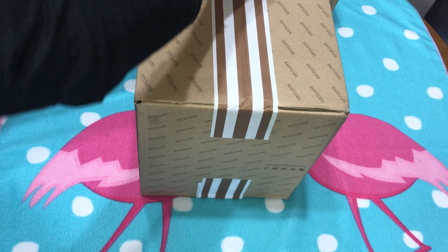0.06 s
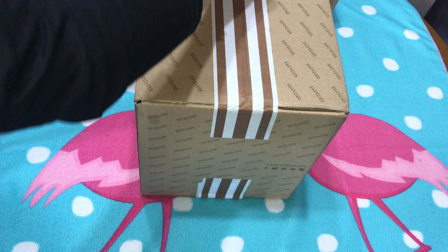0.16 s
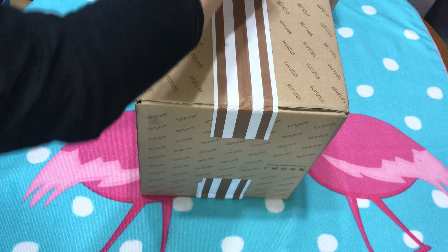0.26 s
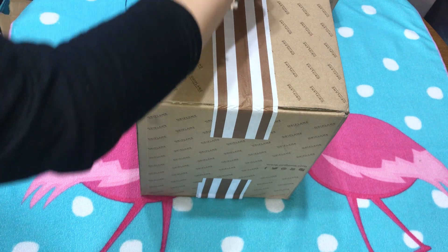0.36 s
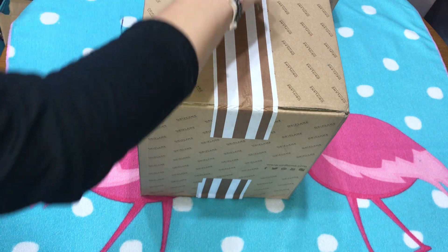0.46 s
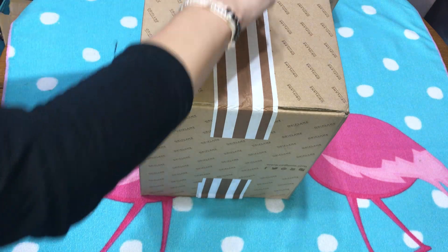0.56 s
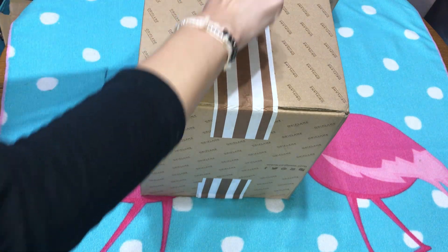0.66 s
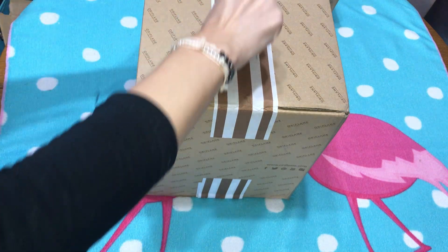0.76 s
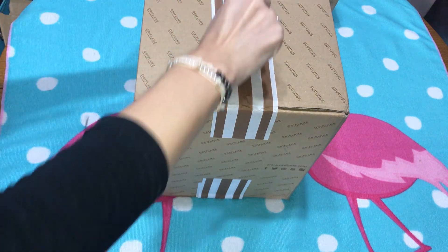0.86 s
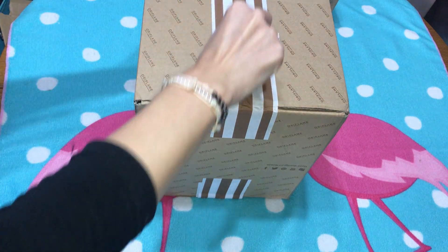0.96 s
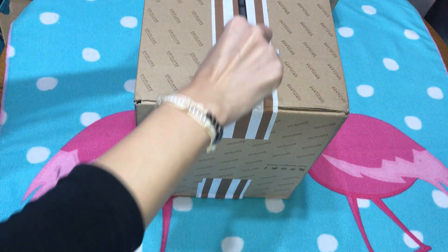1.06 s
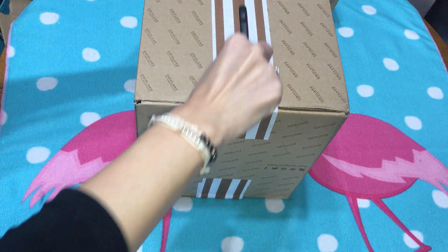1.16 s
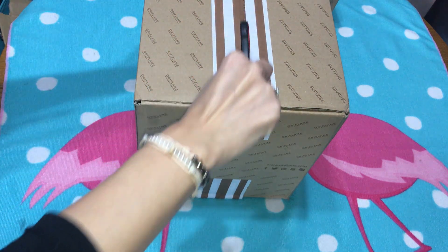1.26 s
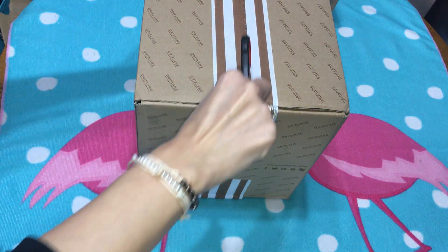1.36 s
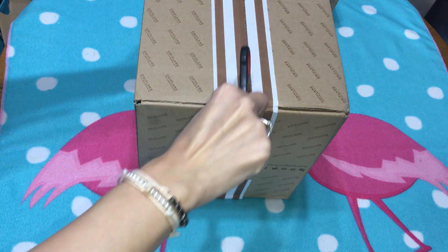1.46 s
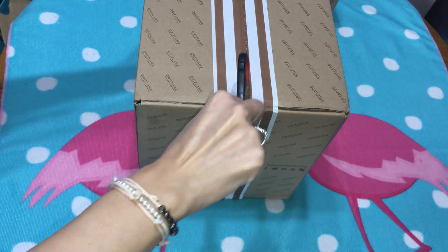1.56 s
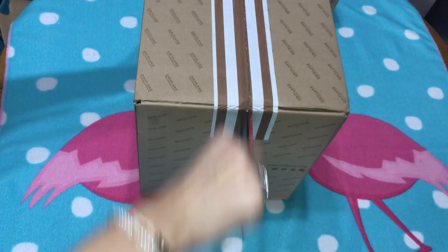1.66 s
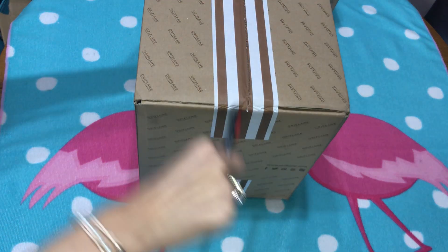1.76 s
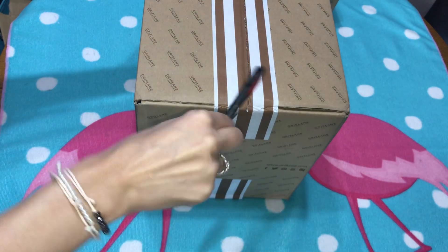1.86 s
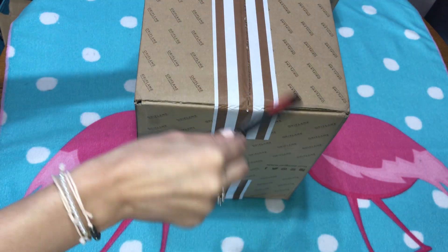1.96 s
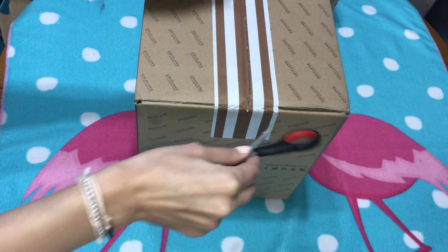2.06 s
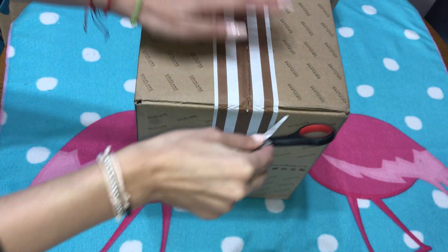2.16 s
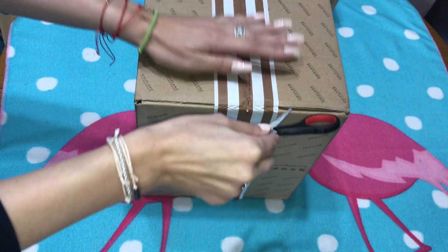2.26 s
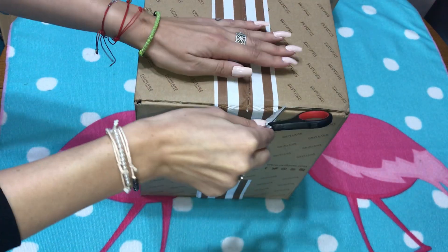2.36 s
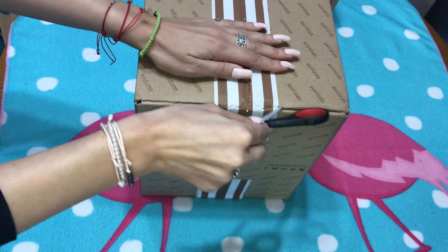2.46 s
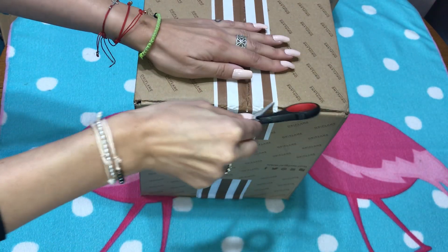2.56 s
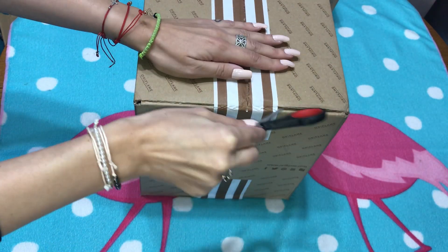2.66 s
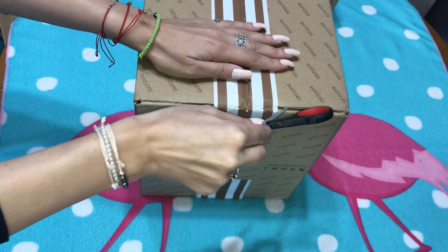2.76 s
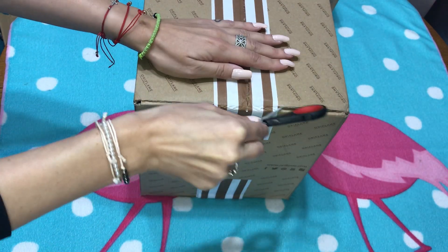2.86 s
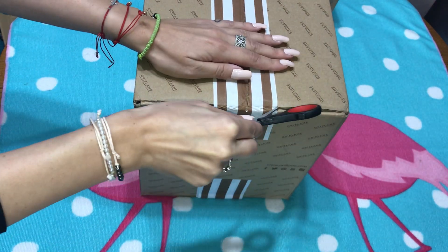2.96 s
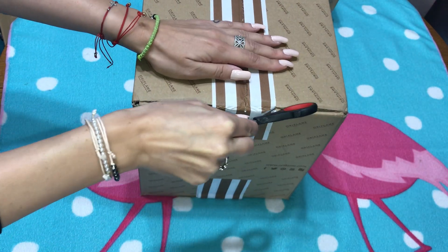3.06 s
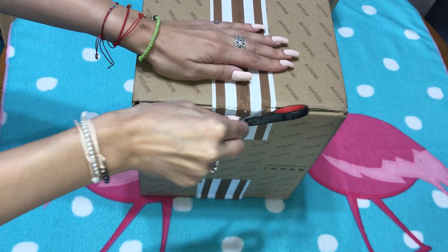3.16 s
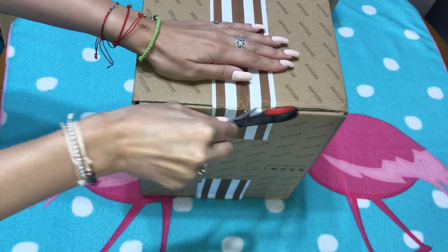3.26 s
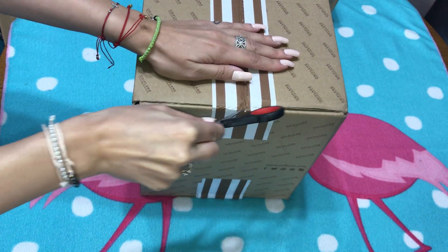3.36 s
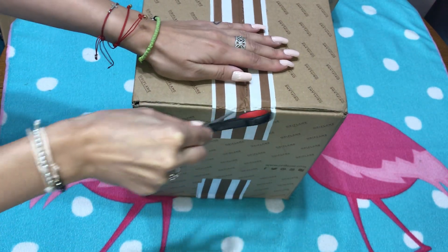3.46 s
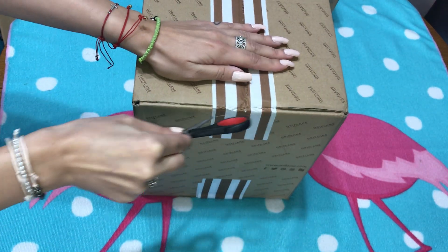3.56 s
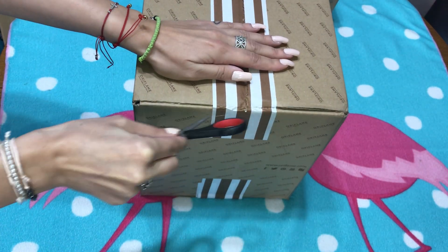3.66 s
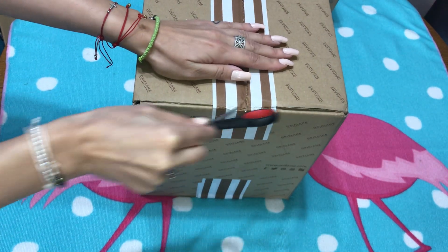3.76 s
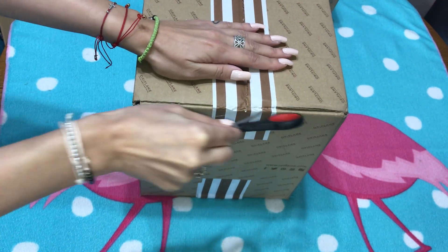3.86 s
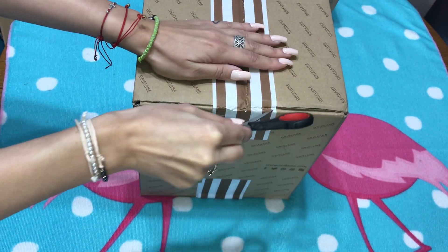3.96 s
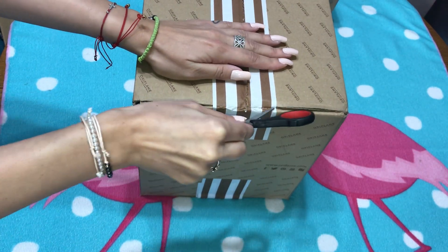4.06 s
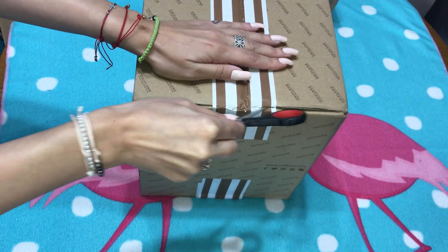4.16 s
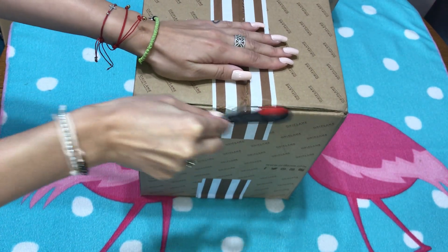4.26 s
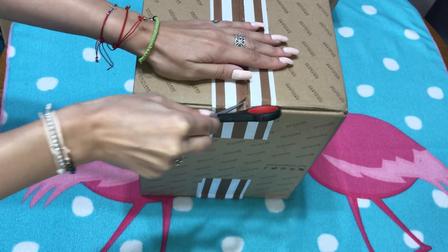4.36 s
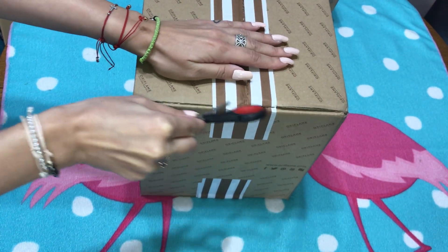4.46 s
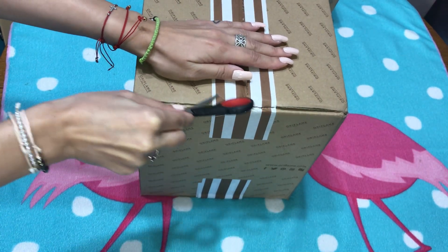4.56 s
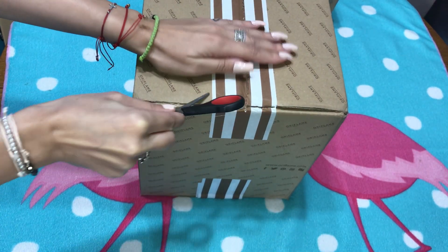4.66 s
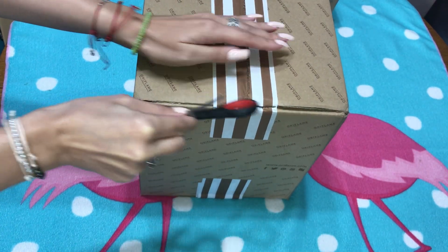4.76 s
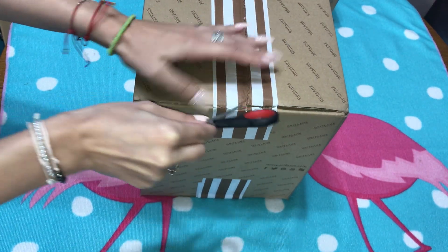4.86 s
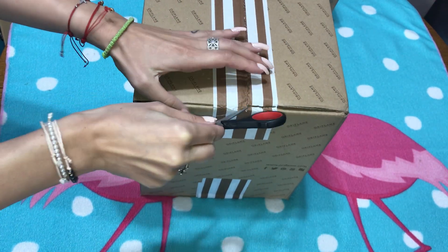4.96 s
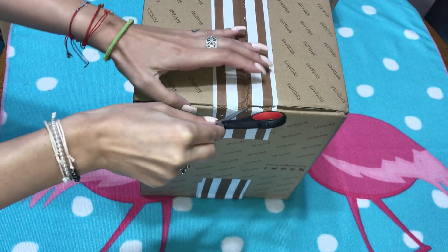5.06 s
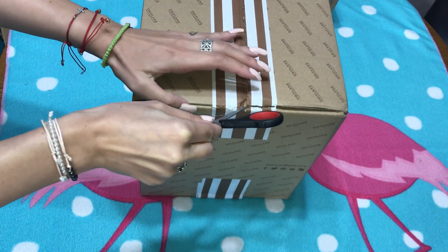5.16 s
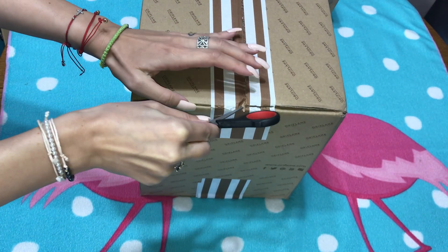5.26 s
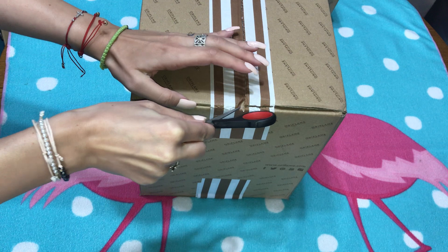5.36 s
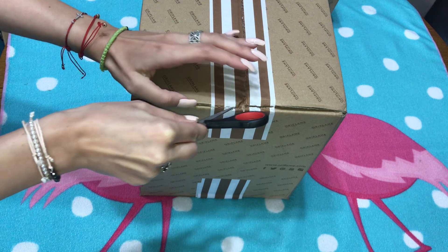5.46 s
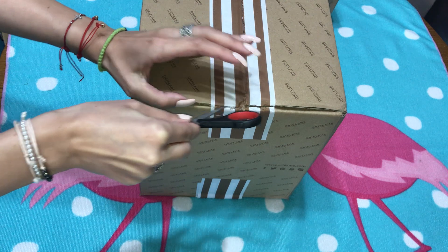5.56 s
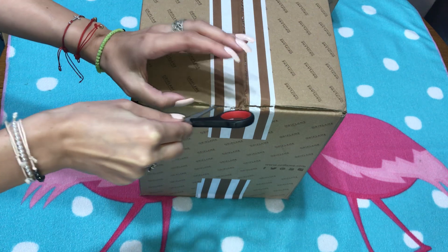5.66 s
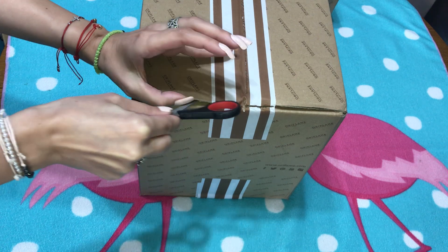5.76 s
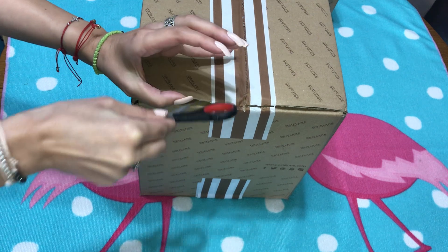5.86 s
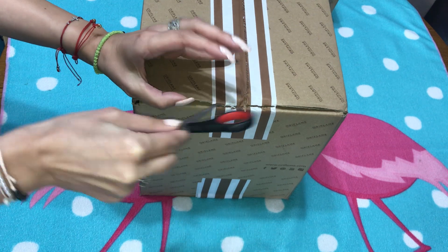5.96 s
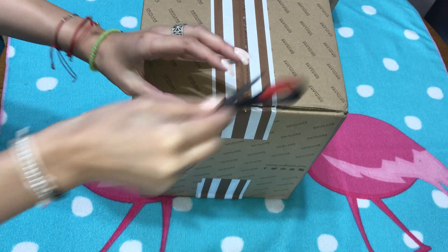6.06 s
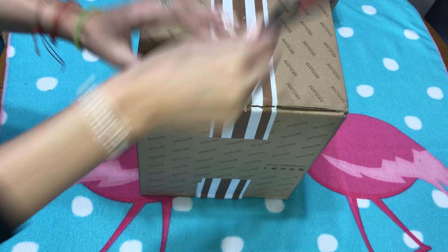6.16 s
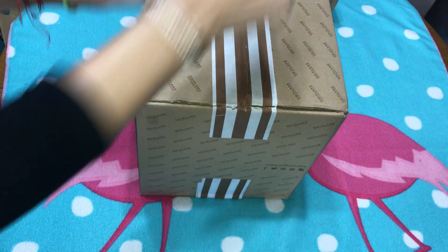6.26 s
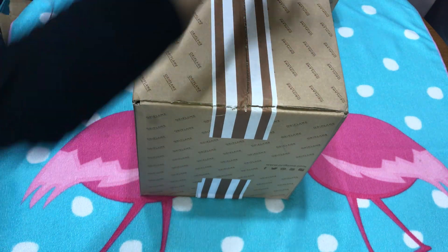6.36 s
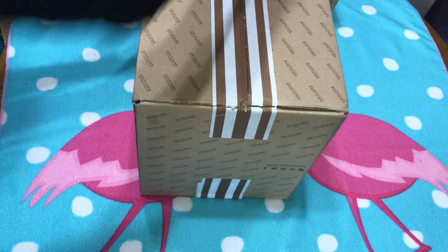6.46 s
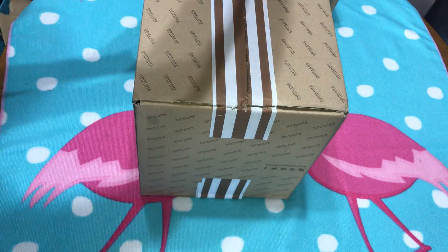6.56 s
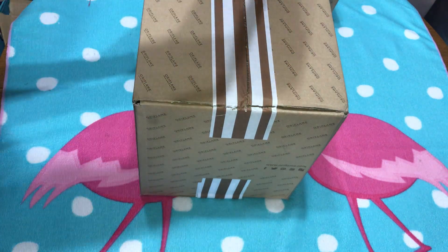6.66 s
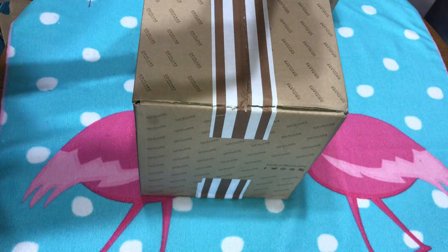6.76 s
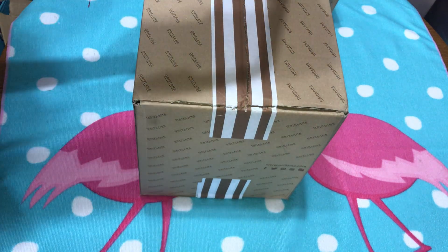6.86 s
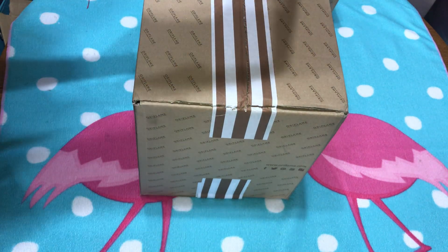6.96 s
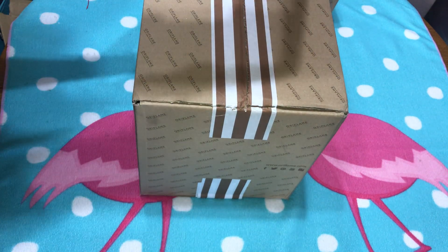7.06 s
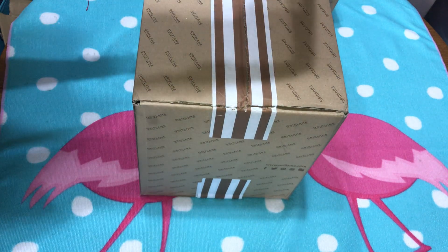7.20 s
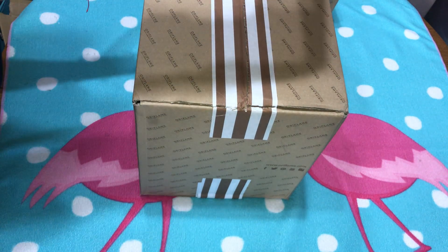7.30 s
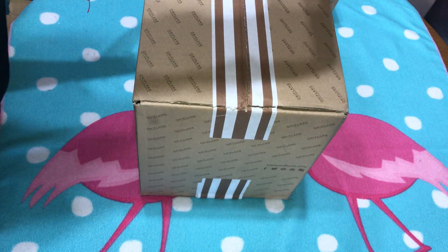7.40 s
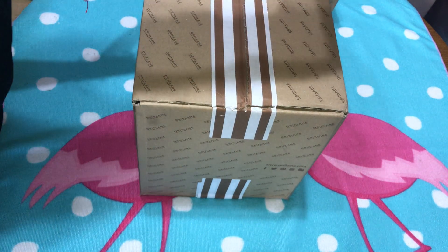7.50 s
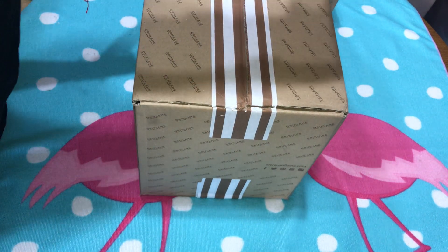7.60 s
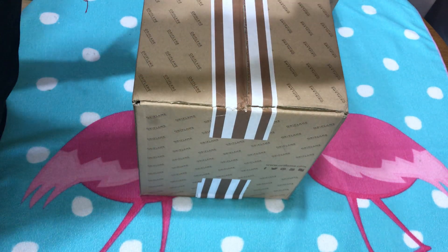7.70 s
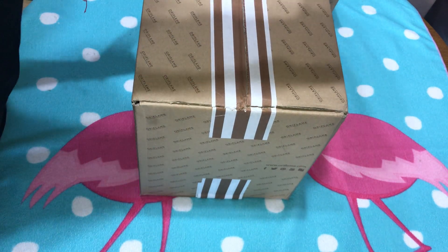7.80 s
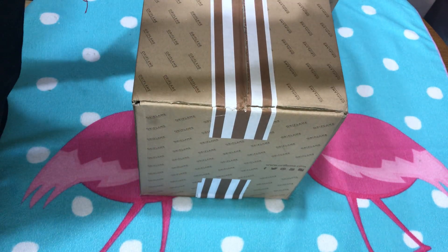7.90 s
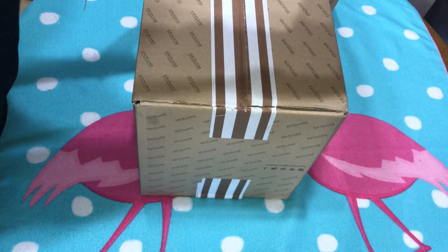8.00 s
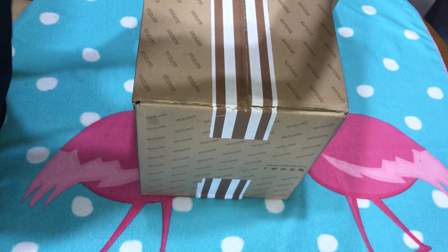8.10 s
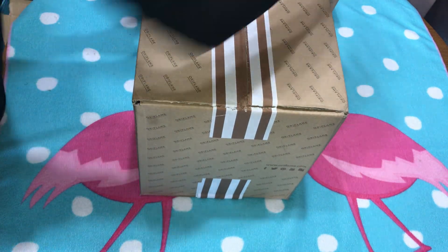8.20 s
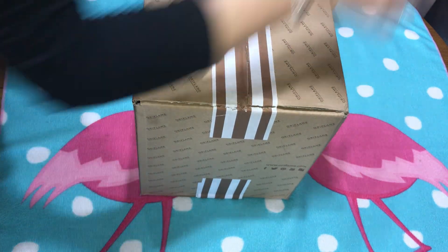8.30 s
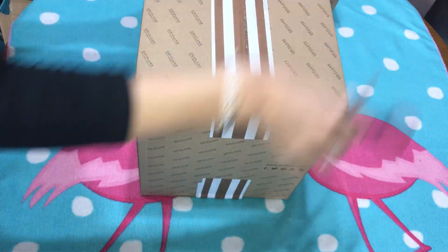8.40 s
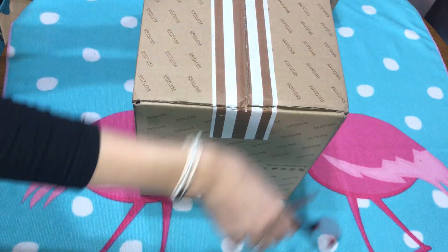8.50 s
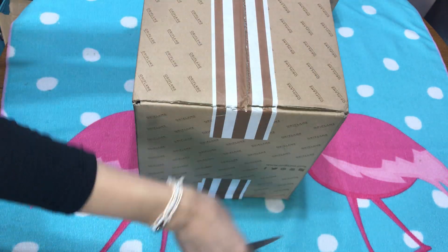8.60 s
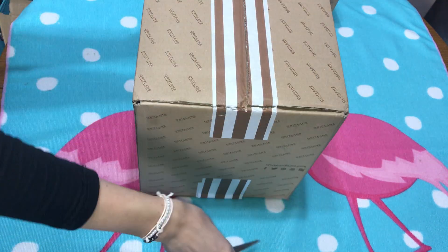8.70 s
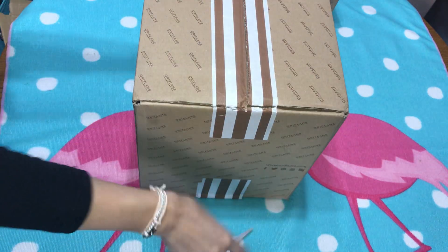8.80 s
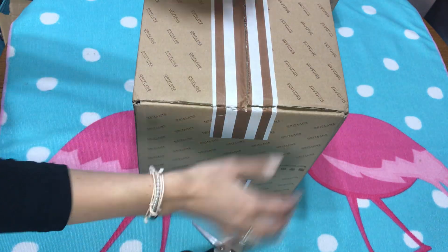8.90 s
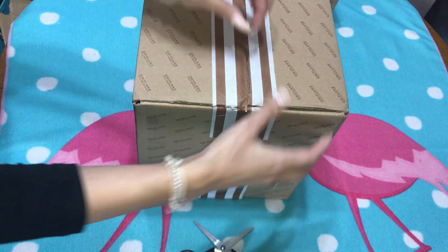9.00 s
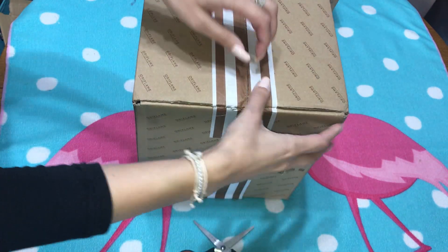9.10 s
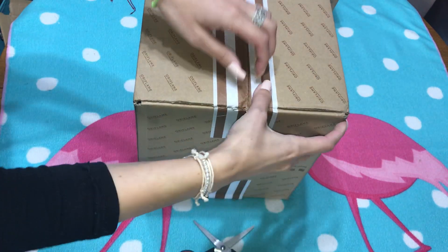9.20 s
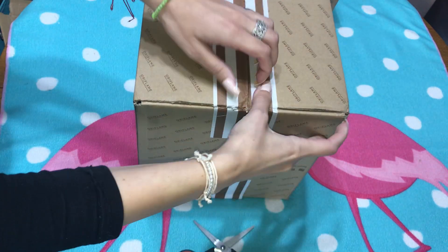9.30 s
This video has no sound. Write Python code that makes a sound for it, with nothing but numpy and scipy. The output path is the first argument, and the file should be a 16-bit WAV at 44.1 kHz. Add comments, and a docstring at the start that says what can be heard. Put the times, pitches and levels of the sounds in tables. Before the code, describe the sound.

Tape on a cardboard box is cut open, heard close and dry with faint steady room hiss. The first tearing stroke is loudest and continuous, gritty and fizzy with snaps along it. After a near pause, thin scratchy scrapes and high blade clicks come in separate bursts, with a few sharp cracks standing out. Finally the flaps rustle and the hollow box gives soft dull thuds.

```python
"""A scissor blade slits packing tape along the seams of a cardboard box in a small soft room.
At once the tape tears, over faint steady air: clumps of tiny ruptures, made from uneven noise, hiss and buzz,
ring the blade, rustle the flaps and boom in the hollow box. Snaps, knocks and bead clicks, short noise bursts,
fall between. After about two seconds the strokes come softer and in pieces, with strong cuts near 5.8 and 7.9 s,
until the scissors are laid down and fingers take the flaps."""
import sys
import numpy as np
from scipy import signal
from scipy.fft import rfft, irfft
from scipy.io import wavfile
from scipy.ndimage import uniform_filter1d

SR = 44100
rng = np.random.default_rng(int(sys.argv[2]) if len(sys.argv) > 2 else 0)


def waveform_to_disk(signal):
    """Save audio, clipped to [-1, 1], as 16-bit WAV at the path in sys.argv[1]."""
    frames = np.transpose(np.atleast_2d(signal))
    scaled = np.clip(frames, -1, 1) * 32767
    samples = np.round(scaled).astype(np.int16)
    wavfile.write(sys.argv[1], SR, samples)


N = 411894


def amp(db):
    """Turns decibels into a gain."""
    return 10 ** (np.asarray(db) / 20)


def evened(x):
    """Scales a sound to an average strength (rms) of 1."""
    return x / np.sqrt(np.mean(x ** 2) + 1e-20)


def read(points, hz):
    """Reads a table between its points, with pitch spaced as the ear hears it (log frequency)."""
    point_hz, value = np.transpose(points)
    return np.interp(np.log(hz + 1), np.log(point_hz + 1), value)


def coloured(x, spectrum):
    """Gives a sound the tone colour of a spectrum, at rms 1."""
    hz = np.fft.rfftfreq(len(x), 1 / SR)
    return evened(irfft(rfft(x) * amp(read(spectrum, hz)), len(x)))


def wander(per_s):
    """Random drift of rms 1 that changes about per_s times a second."""
    size = int(SR / per_s)
    smooth = uniform_filter1d(rng.standard_normal(N), size)
    return evened(uniform_filter1d(smooth, size))


def patchy(x, patch_db):
    """The colour drifts in patches as the point of contact moves."""
    z = signal.stft(x, nperseg=256)[2]
    patches = uniform_filter1d(rng.standard_normal(z.shape), 4, 0)  # smooth across pitch
    patches = uniform_filter1d(patches, 24, 1)  # and across time
    return evened(signal.istft(z * amp(patch_db * evened(patches)), nperseg=256)[1][:N])


def ring(x, modes):
    """A force x strikes a body whose fading tones, the modes, have unit energy together."""
    t = np.arange(SR // 5) / SR
    body = np.zeros(len(t))
    for k, (pitch_hz, level_db, t60_s) in enumerate(modes):
        fading = amp(level_db - 60 * t / t60_s)
        body += (-1) ** k * fading * np.sin(2 * np.pi * pitch_hz * t)
    return signal.oaconvolve(x, body / np.linalg.norm(body))[:N]


def resonate(x, hz, width_hz):
    """A moving resonance: shifts the curve hz down to zero, smooths, and shifts back."""
    turn = np.exp(2j * np.pi * np.cumsum(hz) / SR)
    r = np.exp(-np.pi * width_hz / SR)
    return 2 * (turn * signal.lfilter([1 - r], [1, -r], x / turn)).real


# still room spectrum, only its shape counts: pitch_hz [Hz], level_db [dB per Hz]
AIR_SPECTRUM = [(15, -48.5), (25, 3), (86, -4.5), (324, -14), (2140, -24), (5950, -26.5), (7580, -30.5),
                (8450, -29.5), (15700, -31)]
AIR_DB = -69


def air():
    """The still room and microphone hiss: coloured noise whose level drifts slightly."""
    return amp(AIR_DB + .8 * wander(4.5)) * coloured(rng.standard_normal(N), AIR_SPECTRUM)


def ruptures(clump_db, spike_db, slips_per_s):
    """Fibres and glue let go one by one, in clumps; a few let go hard, and the blade sticks and slips."""
    clumps_db = clump_db * (0.27 * wander(69) + 0.63 * wander(130) + 0.77 * wander(400))
    spikes_db = spike_db * np.minimum(rng.exponential(1, N), 6)
    slips = (rng.random(N) < slips_per_s / SR) * np.minimum(rng.exponential(0.99, N), 1.4)
    jolts = 1 + signal.lfilter([1], [1, -np.exp(-1 / (0.002 * SR))], slips)  # each slip dies in a few ms
    return evened(rng.standard_normal(N) * amp(clumps_db + spikes_db) * jolts)


# snaps, knocks and clicks: start_s [s], crack_db [dB], crack_hz [Hz], then levels against the crack:
# sizzle_db above 11 kHz [dB], flap_db [dB], hollow_db [dB]
SNAP_EVENTS = [(0.0727, -32, 2500, -19, -11, -18), (0.1391, -27, 3560, -18, -12, -14),
               (0.2418, -18, 4100, -23, -21, -20.5), (0.2738, -26, 6150, -23, -28, -21),
               (0.292, -19.5, 2030, -22, -21, -13), (0.464, -22.5, 6750, -21, -18, -6.5),
               (0.9872, -25, 9310, -20, -15, -20), (1.0287, -33, 3740, -17, -7, -18),
               (1.1431, -22, 5680, -20, -29, -13), (1.296, -28, 4010, -16, -18, -11),
               (1.359, -32, 2780, -21, -15, -28), (1.3984, -19, 6500, -19, -25, -27),
               (1.5387, -24.5, 2780, -19, -10, -36), (1.5668, -25, 3330, -19, -12, -26),
               (1.5894, -24, 2750, -21, -24, -21), (1.6287, -21.5, 3530, -16, -14, -21),
               (1.6643, -19.5, 2800, -20, -26, -20), (1.709, -16, 2870, -13, -15.5, -17),
               (1.737, -32, 3270, -16, -13, -32), (1.9604, -43, 2800, -19, -13, -26),
               (2, -39, 3280, -18, -12.5, -18), (2.3543, -53, 2090, -17, -14, -15),
               (2.4628, -56, 2240, -18, -18, -14), (2.6235, -30.5, 8220, -17, -26, -22),
               (2.9907, -33, 5500, -16, -14, -16), (3.0289, -33.5, 3260, -18, -20, -23),
               (3.0452, -51, 3270, -23, -1, -19), (3.0619, -42, 3080, -12, -4.5, -15),
               (3.0736, -37, 9800, -22, -14, -15), (3.1443, -36, 5470, -10, -16, -19),
               (3.1817, -34.5, 9430, -12, -10, -19), (3.2017, -22, 8940, -18, -30, -22),
               (3.2234, -22.5, 8750, -17, -29, -22), (3.2866, -22.5, 8900, -19, -24, -24),
               (3.3483, -28, 4000, -8, -21, -13), (3.3693, -23.5, 8790, -16, -16, -19),
               (3.4298, -29, 3530, -22, -18, -25), (3.4422, -25, 8940, -21, -16, -29),
               (3.5568, -41, 8250, -7, -26, -21), (3.5797, -19.5, 9000, -29, -28, -31),
               (3.6232, -35, 3070, -12, -4, -2), (4.141, -40.5, 8570, -9, -4, -14),
               (4.161, -19, 2000, -17, -15, -24), (4.1766, -37, 2030, -21, -7, -23),
               (4.3015, -35, 8760, -19, -25, -33), (4.3171, -23, 6250, -16, -25, -29),
               (4.3214, -22, 3080, -16, -11, -35), (4.372, -17.5, 4630, -14, -18, -23),
               (4.377, -22, 2190, -13, -23, -17), (4.516, -26, 3680, -24, -30, -31),
               (4.5376, -22, 3540, -21, -38, -21), (4.7282, -39, 4150, -17, -3, -7),
               (4.9488, -43.5, 2380, -22, -10, -15), (5.278, -37.5, 8900, -25, -12, -26),
               (5.3314, -50, 9670, -22, -6, -14), (5.3903, -37, 8750, -14, -17, -26),
               (5.483, -28.5, 7320, -24, -30, -32), (5.4912, -24, 9000, -15, -28, -30),
               (5.5229, -10, 8000, -17, -26.5, -20), (5.6251, -21, 8970, -18, -15, -14.5),
               (5.687, -23.5, 8920, -22, -23, -24), (5.7295, -21.5, 8800, -13, -17, -26),
               (5.7824, -27, 5080, -4, -11, -21), (5.7965, -6.5, 5710, -19, -11, -21),
               (5.8584, -25, 8300, -21, -9, -14), (5.9486, -30, 3820, -31, -20, -20),
               (5.9596, -30, 5200, -10, -19, -30), (6.102, -46.5, 3300, -19, -5.5, -2),
               (6.183, -21.5, 6650, -11, -19, -23), (6.3894, -43, 5800, -22.5, -25, -28),
               (6.4338, -48, 9800, -16.5, -27, -27), (6.5814, -49, 8390, -26.5, -24.5, -23),
               (6.7176, -56, 2860, -14.5, -5.5, 14.5), (7.0783, -38.5, 8900, -16, -14.5, -12),
               (7.2505, -51.5, 3000, -18, -1, -5), (7.2804, -59, 2970, -12, 5, -8),
               (7.3048, -55, 2300, -10, -2, -8), (7.3443, -33, 4470, -19, -15, -8),
               (7.3801, -41, 2990, -11, -18, -19), (7.3923, -22.5, 3160, -22, -28, -19),
               (7.423, -24, 2990, -21, -42, -31), (7.5372, -33, 3100, -6, -12, -22),
               (7.547, -28, 3660, -16, -21, -26), (7.5738, -22, 4240, -25, -7.5, -10.5),
               (7.5929, -21.5, 3460, -9, -10, -29), (7.6211, -16.5, 6600, -18, -19, -33),
               (7.7056, -13, 9400, -13, -22, -21), (7.842, -32, 8380, -17, -13, -16),
               (7.866, -19.5, 3640, -17, -19, -25), (7.909, -6, 3730, -20, -14.5, -20),
               (7.9611, -28.5, 3150, -14, -0.5, 5), (7.9791, -29, 5820, -17, -4.5, -7),
               (8.1613, -48.5, 3060, -18, 9, -6), (8.1783, -45, 3080, -19, 2, -10),
               (8.3526, -53, 2020, -16, -0.5, -8), (8.4926, -26, 4610, -23, -7, -26),
               (8.5088, -24.5, 2980, -11, -5, -26), (8.538, -16, 5760, -17, -18, -20),
               (8.6217, -25.5, 3740, -18, -19, -17.5), (8.6896, -51.5, 2920, -11, -2, 7),
               (8.7195, -40, 2380, -16, -3.5, -5), (8.738, -38, 5670, -24, -15, -16),
               (8.757, -42, 5770, -25, -7, -12), (8.8543, -32.5, 5660, -9, -12.5, -3),
               (8.9032, -25.5, 5100, -10, -2.5, -6), (8.9146, -28.5, 5190, -8, -5.5, -16),
               (9.1441, -33.5, 2540, -10, -1, -16), (9.19, -33, 2370, -19, -12, -26),
               (9.2305, -26, 3000, -27, -1, -40), (9.2678, -36, 2310, -25, -3, -15),
               (9.3118, -39.5, 2140, -21, -15, -7)]
AFTER_DB, AFTER_T60_S = -27, .12  # strength against the crack, and time to fade by 60 dB


def aftermath():
    """Freed tape goes on tearing for a moment after each snap; gives that fading force as power."""
    kicks = np.zeros(N)
    start_s, crack_db = np.transpose(SNAP_EVENTS)[:2]
    kicks[np.round(start_s * SR).astype(int)] = amp(2 * (crack_db + AFTER_DB))
    return signal.lfilter([1], [1, -amp(-120 / (AFTER_T60_S * SR))], kicks)


# one curve a stroke or rustle: time_s [s], force_db of tearing [dB],
# fizz_db above 7 kHz against the force [dB], boom_db of the push on the hollow [dB]
STROKE_CURVES = [
    [(0.0, -39.5, -11, -46.5), (0.164, -45.5, -1, -52), (0.212, -51, -10, -57), (0.279, -43, -5, -44),
     (0.343, -50, -2, -47.5), (0.379, -44, -7, -55), (0.455, -43.5, -2, -48), (0.734, -44, 0.5, -38.5),
     (0.802, -38.5, 1, -32.5), (0.938, -44, -8.5, -51.5), (1.018, -45.5, 1, -36.5), (1.038, -38, -2, -39),
     (1.109, -43, -3.5, -49), (1.441, -38, -3, -42), (1.533, -42.5, -0.5, -50), (1.728, -49, 0, -48),
     (1.752, -38.5, -3, -98), (1.84, -70, -14, -112)],
    [(1.932, -70, -10, -78), (1.972, -63.5, -24, -83), (2.027, -64, 5, -69), (2.119, -81, -4, -99)],
    [(2.331, -84, -9, -76), (2.367, -72.5, -2, -79), (2.538, -76, -8, -70), (2.586, -56.5, 1, -55.5),
     (2.718, -58, -10, -63), (2.79, -99, -4, -106)],
    [(2.981, -75, -3, -74), (2.993, -81, -4, -63), (3.129, -70, -1, -65), (3.225, -50, 9.5, -51.5),
     (3.336, -54, 6, -60), (3.36, -50, 9, -52), (3.448, -48.5, 1, -58), (3.496, -59.5, 3, -62),
     (3.596, -51, 3, -49.5), (3.728, -56, -2, -51), (3.799, -83, -3, -93)],
    [(4.121, -71, 5, -76), (4.165, -62, -14, -58), (4.224, -62, 0, -56.5), (4.32, -51, 1.5, -53),
     (4.376, -50, -1, -56), (4.484, -59.5, 3, -63), (4.54, -44, -5, -63.5), (4.588, -51, -4, -52.5),
     (4.735, -56.5, -6, -53), (4.899, -76.5, 2, -77)],
    [(5.22, -81, 0, -84), (5.264, -72, 4, -64.5), (5.44, -72.5, 4.5, -67), (5.539, -58, 2, -49),
     (5.599, -54.5, 2, -60)],
    [(5.601, -67, -2, -72), (5.629, -46, 7, -46), (5.781, -55.5, 6.5, -62), (5.801, -39, -6, -35.5),
     (5.921, -63.5, -0.5, -65), (6.164, -70, -2, -74), (6.192, -56.5, -4, -43.5), (6.236, -69.5, 1, -76),
     (6.3, -77, -4, -93)],
    [(6.9, -80, 1, -81.5), (7.208, -76.5, -9, -68.5), (7.291, -83, 1, -72), (7.359, -58, -4, -51),
     (7.447, -61.5, -6, -91), (7.499, -70, -4, -60)],
    [(7.501, -74, -3, -64), (7.545, -54.5, 1, -52), (7.609, -36.5, -3, -36.5), (7.689, -62.5, -1.5, -69),
     (7.712, -41.5, 5.5, -46), (7.772, -53.5, -2, -48.5), (7.808, -63, 0, -51.5), (7.9, -34, -8, -44.5),
     (7.976, -46, -7.5, -41), (8.09, -77, -7, -93)],
    [(8.151, -70, 1, -50), (8.243, -76, -1, -75.5), (8.287, -68, -7, -59.5), (8.419, -88, 0, -75.5)],
    [(8.481, -93, -2, -65), (8.501, -45, -7, -41), (8.684, -71.5, -5.5, -73), (8.692, -76, -9, -61),
     (8.8, -60, -2, -58), (8.844, -79, -5, -71), (8.852, -91, 3, -59), (8.928, -55.5, 3, -47.5),
     (8.98, -68, -3, -62.5), (9.129, -72.5, 0, -82)],
    [(9.131, -82, 3, -77), (9.147, -58.5, -12, -46.5), (9.223, -58.5, -3, -81), (9.329, -71, -5, -48)],
]
# how each stroke touches the box: blade_share before brightness adds to it [0-1],
# rustle_db of the flaps against the force [dB], rasp_hz of the slit edge at the start [Hz],
# taut_hz of the tight tape at the start [Hz]
STROKE_TOUCH = [(0.08, -1, 4900, 1750), (0, -0.5, 3480, 1020), (0.2, 2.5, 3850, 1500), (0, 2.5, 3300, 1400),
                (0.1, 1, 4400, 1600), (0.1, 0, 5400, 1100), (.08, 3, 7200, 1350), (0, 0.5, 3500, 1500),
                (0, 1.5, 4200, 1300), (0.04, 7.5, 4100, 1400), (0.15, 3.5, 7200, 830), (0, 7.5, 3400, 840)]
# tearing tape, only the shape counts: pitch_hz [Hz], level_db [dB per Hz]
TAPE_SPECTRUM = [(1200, -20), (2200, -11.5), (2900, -1.5), (3700, -1.5), (4900, -7), (6300, 0), (7700, -4),
                 (9300, 1), (10500, -8), (12000, -1), (16000, -5.5)]
# tones of the blade, levels against each other: pitch_hz [Hz], level_db [dB], t60_s to fade by 60 dB [s]
BLADE_MODES = [(5720, -8, .004), (8250, -4, .005), (8770, 0, .005), (9150, -5, .004), (12180, -7, .003)]
# tones of the cardboard flaps: pitch_hz [Hz], level_db [dB], t60_s [s]
FLAP_MODES = [(508, -1, 0.03), (624.5, -2, 0.034), (730, 2, 0.024), (948, 6, 0.0082), (1187, 3, 0.02),
              (1494, 11, 0.0055), (1805, 10, 0.02), (1810, 10, 0.017), (2180, 10.5, 0.0011)]
# tones of the hollow box: pitch_hz [Hz], level_db [dB], t60_s [s]
HOLLOW_MODES = [(60, -24.5, 0.35), (97, -24.5, 0.23), (144.4, -9.5, 0.055), (222, -3.5, 0.084),
                (269, 0, 0.042), (324, 2.5, 0.048), (440, -11, 0.045)]
HOLD_S = .012  # a stroke keeps its last force this long, unless the next one takes over
SLACKEN_PER_S = .15  # both pitches sink by this share a second as the slit grows
FLAP_FOLLOWS_PUSH = 0.23  # the flaps follow the force, and the push by this share
RING_PER_DB = .04  # the brighter the cut, the more of its fizz is the blade ringing


def stroke_controls():
    """The hand's force and touch, spread over time: three level curves, then the four touch settings."""
    t = np.arange(N) / SR
    controls = np.zeros((7, N))
    controls[:3] = -120  # silent between strokes
    for rows, touch in zip(STROKE_CURVES, STROKE_TOUCH):
        time_s, *columns = np.transpose(rows)
        inside = (t >= time_s[0]) & (t <= time_s[-1] + HOLD_S)
        controls[:3, inside] = [np.interp(t[inside], time_s, c) for c in columns]
        controls[3:, t >= time_s[0]] = np.array(touch)[:, None]
        controls[5:, inside] *= 1 - SLACKEN_PER_S * (t[inside] - time_s[0])
    return controls


def strokes():
    """One train of ruptures drives the tape, the blade, the flaps and the hollow."""
    force_db, fizz_db, boom_db, share, rustle_db, rasp_hz, taut_hz = stroke_controls()
    fizz_db = np.where(force_db > -110, fizz_db, 0)  # neutral between strokes
    flap_db = force_db + FLAP_FOLLOWS_PUSH * (boom_db - force_db) + rustle_db
    powers = amp(2 * np.array([force_db, flap_db])) + aftermath()
    hiss_db, flap_db = 10 * np.log10(powers)
    share = np.clip(share + RING_PER_DB * fizz_db, 0, 1)
    drive = patchy(ruptures(1.0, 1.7, 160), 2.35)

    tape = coloured(drive, TAPE_SPECTRUM)
    low = signal.sosfiltfilt(signal.butter(2, 7000, fs=SR, output="sos"), tape)
    fizz = np.sqrt(1 - share) * evened(tape - low) + np.sqrt(share) * ring(drive, BLADE_MODES)
    rasp = evened(resonate(drive, np.maximum(rasp_hz, 0), 700))  # the free edge of the slit buzzes
    hiss = amp(hiss_db) * (0.76 * evened(low) + 0.15 * rasp + amp(fizz_db) * fizz)

    # the strip of tape under tension hums
    hum_hz = np.maximum(taut_hz * (1 + 0.057 * wander(5)), 0)
    taut = amp(flap_db - 7.5) * evened(resonate(drive, hum_hz, 260))
    rustle = ring(amp(flap_db - 3.0) * drive, FLAP_MODES)
    boom = ring(amp(boom_db) * drive, HOLLOW_MODES)
    return hiss + taut + rustle + boom


SNAP_RISE_S, SNAP_T60_S = 0.00081, 0.013  # time to full strength, then to fade by 60 dB


def snaps():
    """Each snap is a short burst: a crack with its own colour, and a blow to the flaps and the hollow."""
    crack, flap, boom = np.zeros((3, N + 3000))
    t = np.arange(3000) / SR
    fading = amp(-60 * np.maximum(t - SNAP_RISE_S, 0) / SNAP_T60_S)
    shape = np.minimum(t / SNAP_RISE_S, 1) * fading
    for start_s, crack_db, crack_hz, sizzle_db, flap_db, hollow_db in SNAP_EVENTS:
        burst = rng.standard_normal(len(t)) * shape
        burst[round(SNAP_RISE_S * SR)] += 2.6  # the first break is one sharp tick
        wide = signal.lfilter(*signal.butter(2, [2200, 11000], "band", fs=SR), burst)
        peak = signal.lfilter(*signal.iirpeak(crack_hz, 2.5, SR), burst)
        sizzle = signal.lfilter(*signal.butter(3, 11000, "high", fs=SR), burst)
        bright = 0.58 * wide + 1.5 * peak
        start = round(start_s * SR)
        at = slice(start, start + len(t))
        crack[at] += amp(crack_db + 9) * bright / np.linalg.norm(bright)
        crack[at] += amp(crack_db + sizzle_db + 24) * sizzle / np.linalg.norm(sizzle)
        flap[at] += amp(crack_db + flap_db + 17) * burst / np.linalg.norm(burst)
        push = abs(burst) / abs(burst).sum()  # a one-way push on the wall
        boom[at] += amp(crack_db + hollow_db + 28.5) * push
    return crack[:N] + ring(flap, FLAP_MODES) + ring(boom, HOLLOW_MODES)


TICKS_PER_S, TICK_DB, TICK_SPREAD_DB = 9.8, -63.5, 2  # average rate, smallest level, random extra level


def ticks():
    """Beads and loose fibres tick faintly at random: bursts of tape-coloured noise a few ms long."""
    t = np.arange(400) / SR
    levels_db = TICK_DB + TICK_SPREAD_DB * np.minimum(rng.exponential(1, N), 3)
    sizes = (rng.random(N) < TICKS_PER_S / SR) * amp(levels_db)
    spans = signal.oaconvolve(sizes, amp(-60 * t / 0.008))[:N]
    return spans * patchy(coloured(rng.standard_normal(N), TAPE_SPECTRUM), 5)


# how long the room's echo lasts: pitch_hz [Hz], t60_s to fade by 60 dB [s]
WALL_DECAY = [(150, 0.12), (500, 0.26), (2000, 0.19), (7000, 0.075), (14000, 0.07)]


def walls(x):
    """The room answers with sparse echoes of random sign after a few ms, each pitch dying at its own speed."""
    taps = np.zeros(SR // 2)
    at = np.arange(150, len(taps) - 20, 20)
    taps[at + rng.integers(0, 20, len(at))] = rng.choice([-1., 1.], len(at))
    hz, t, z = signal.stft(taps, SR, nperseg=256)
    fading = amp(-60 * t / read(WALL_DECAY, hz)[:, None])
    tail = signal.istft(z * fading, SR, nperseg=256)[1]
    return signal.fftconvolve(x, tail / np.linalg.norm(tail))[:N]


def scene():
    """Box and scissors close by, the room behind them."""
    tearing = strokes()
    blows = snaps() + ticks()
    echo = walls(amp(-16) * tearing + amp(-13.0) * blows)
    return (tearing + blows + echo + air())[None]


EDGE_HZ = 15800  # the treble ends here


def record(dry):
    """The microphone loses the deep bass; then a steep filter cuts the highest treble."""
    thin = signal.sosfilt(signal.butter(3, 55, "high", fs=SR, output="sos"), dry)
    band_limit = signal.firwin(511, EDGE_HZ, window=("kaiser", 9), fs=SR)
    return signal.oaconvolve(thin, band_limit[None], "same")


dry = scene()
out = record(dry)
waveform_to_disk(out)
```